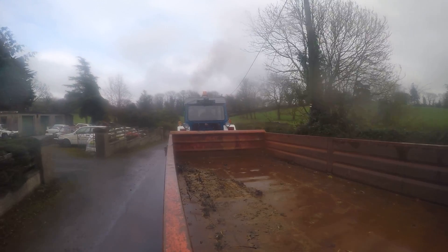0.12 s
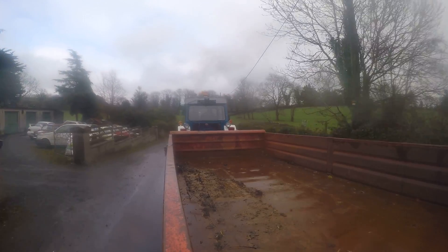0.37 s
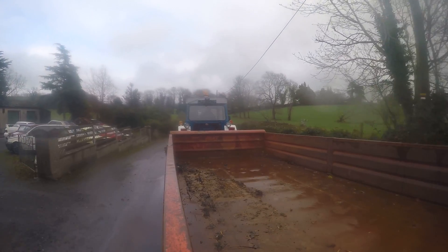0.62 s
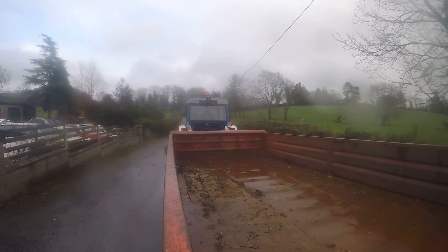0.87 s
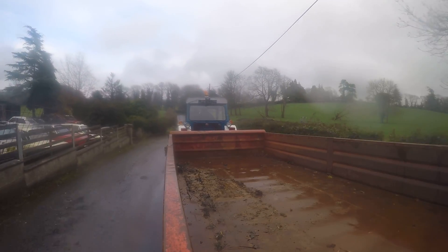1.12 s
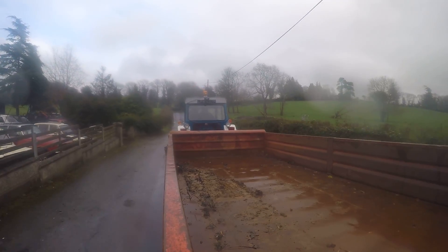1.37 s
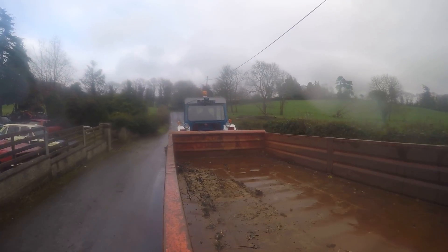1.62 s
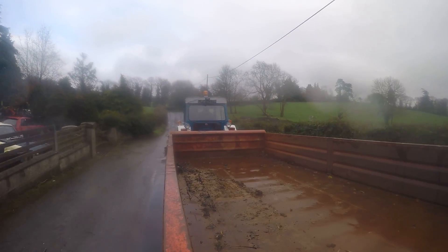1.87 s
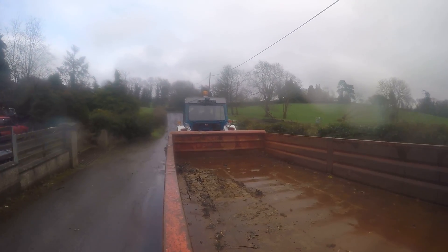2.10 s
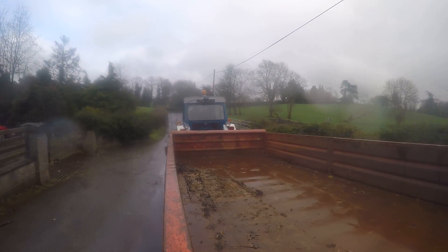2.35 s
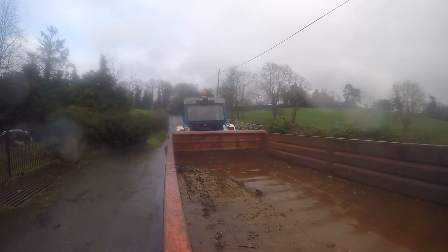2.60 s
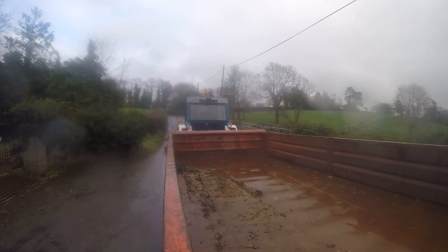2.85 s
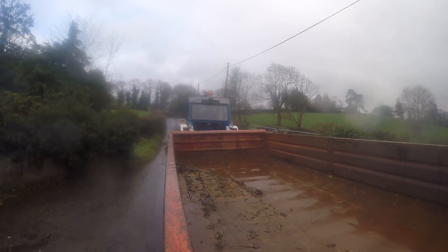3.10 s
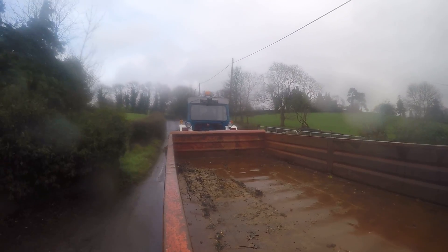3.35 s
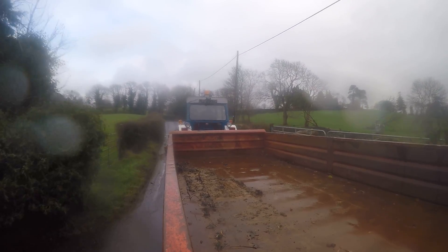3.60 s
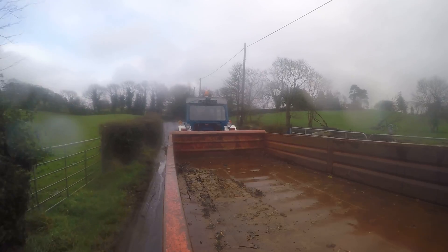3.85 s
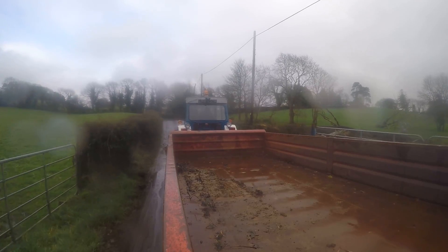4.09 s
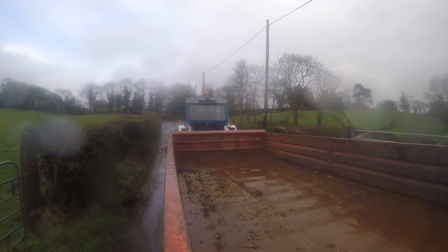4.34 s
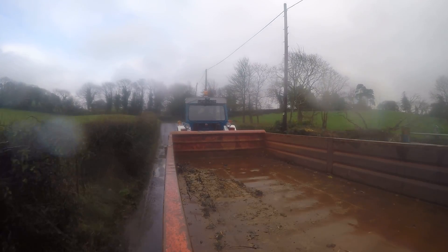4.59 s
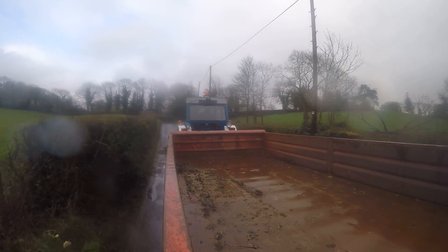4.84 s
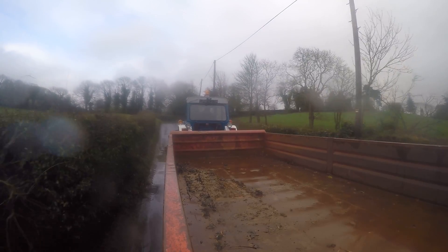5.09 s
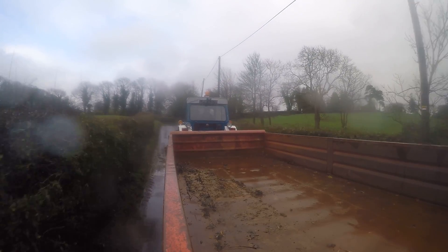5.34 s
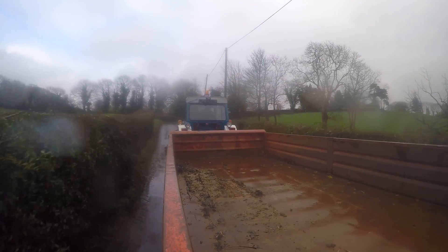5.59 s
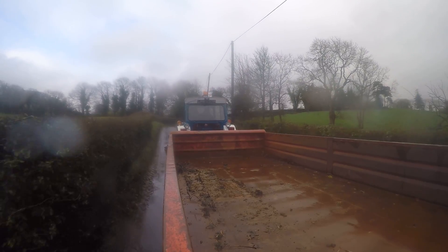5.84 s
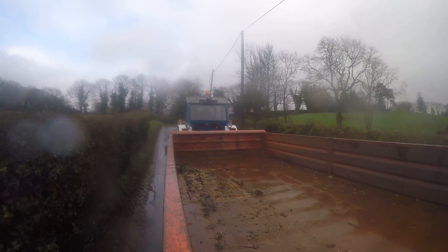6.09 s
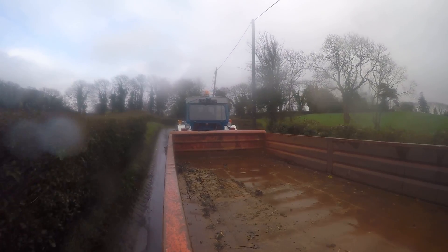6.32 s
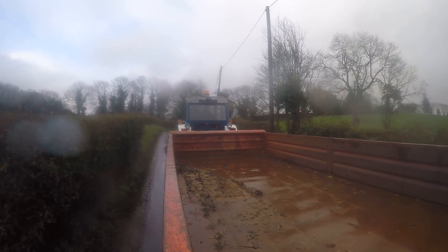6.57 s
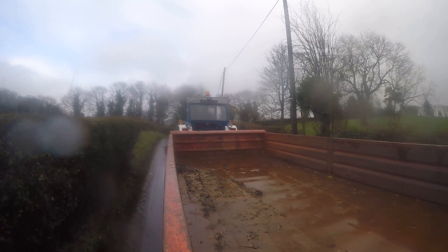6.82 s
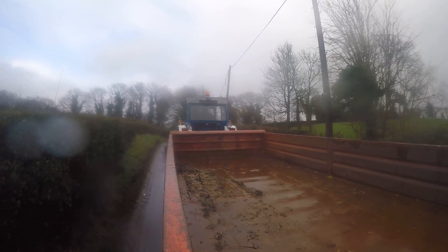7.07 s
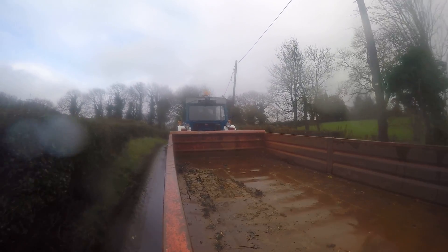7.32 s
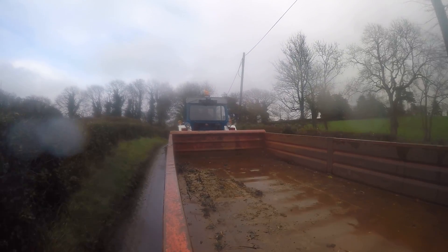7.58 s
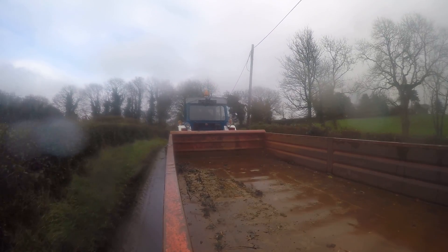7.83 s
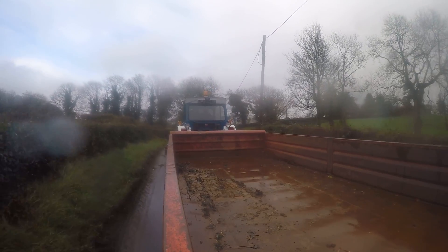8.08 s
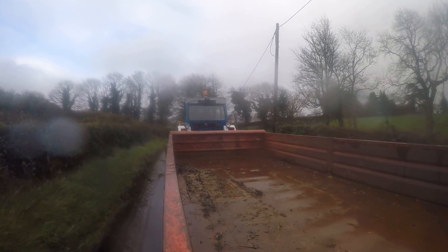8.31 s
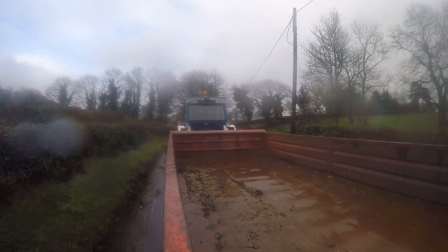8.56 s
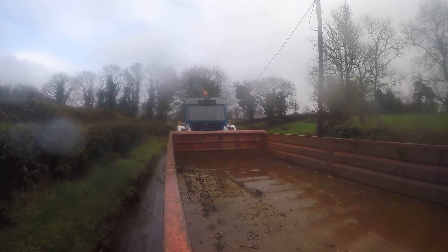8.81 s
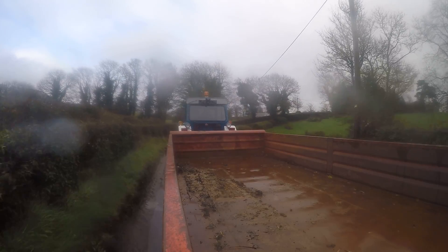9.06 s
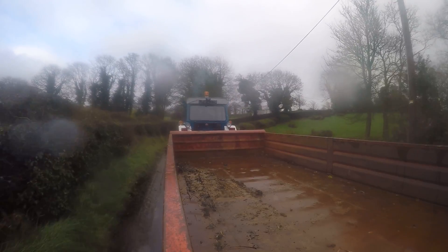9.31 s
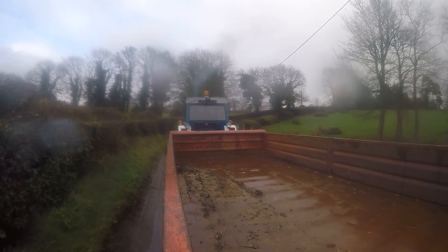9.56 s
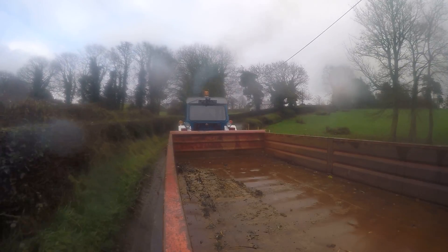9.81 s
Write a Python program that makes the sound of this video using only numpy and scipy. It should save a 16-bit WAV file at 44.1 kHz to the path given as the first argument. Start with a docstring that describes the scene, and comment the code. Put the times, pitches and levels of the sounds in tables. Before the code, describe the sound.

A close, muffled, body-borne sound from a sealed camera clamped to an empty steel trailer on a wet country road. Throughout, low rumble surges and drops unevenly, with a bounce around 35 to 65 hertz, a throbbing hum near 95 and drumming panels. Over it runs a fine, midrange steel rattle. Scattered light knocks open, and a faint gear whine peaks around 1.2 s. A tight clatter with clicks comes at 1.3 s, more bumps at 2.4 and 3.1, and a strong bang at 3.65. Knocks continue from 4 to 6.3 s with small clinks and pin jingles. At 6.7 to 6.8 s comes the loudest crash, with latch clank and harsh ticks. Around 7.2 s it is thinner; knocks return near 7.8, a sharp stone tap at 8.2, then another clatter at 9.2 to 9.4. Tyre hiss and a very thin high whistle remain barely audible; whine rises gently at the end.

```python
"""Camera clamped to an empty steel trailer

A small camera in a sealed housing rides on the rail of an empty steel trailer behind a diesel tractor.
Road shake comes up the clamp as lopsided noise rumble, a wandering hum and panel drumming; struck modes make
the bed rattle and knock, a stone tap, a pin and a latch jingle; noise crackle ticks the camera against its stop.
Gear whine and a turbo whistle (swept sines) and wet tyre hiss (coloured noise) come faintly through the air."""
import sys
import numpy as np
from scipy import signal
from scipy.fft import rfft, irfft, next_fast_len
from scipy.io import wavfile
from scipy.ndimage import uniform_filter1d

SR = 44100
rng = np.random.default_rng(int(sys.argv[2]) if len(sys.argv) > 2 else 0)


def unload_wav(signal):
    """Save mono or channel-first audio to the path in sys.argv[1] as 16-bit WAV at rate SR, clipped to [-1, 1]."""
    wavfile.write(
        sys.argv[1],
        SR,
        np.round(np.clip(np.atleast_2d(signal).T, -1, 1) * 32767).astype(np.int16),
    )


def magnitude_from_level(level_db):
    """Linear magnitude for a level in decibels (20 dB per decade)."""
    exponent = np.asarray(level_db, float) / 20
    return 10 ** exponent


N = 437913
T = np.arange(N) / SR

# low rumble through the clamp: t/s, level/dB
RUMBLE_LEVEL = [(0.0, -14), (0.02, -22.5), (0.39, -14.5), (0.69, -20.5), (1.35, -12), (1.8, -26.5),
                (1.96, -10), (2.29, -21.5), (2.32, -14), (2.65, -19.5), (3.12, -11.5), (3.18, -16),
                (3.48, -19), (3.57, -13), (4.01, -20.5), (4.17, -13), (4.37, -20), (4.51, -12.5),
                (4.73, -21), (4.75, -15), (4.92, -16.5), (5.12, -13.5), (5.42, -26.5), (5.72, -8.5),
                (6.06, -23), (6.25, -11.5), (6.36, -19.5), (6.8, -12.5), (6.88, -27.5), (7.66, -18),
                (9.4, -16), (9.93, -20)]
# steady noise of the road: t/s, bed rattle level/dB, tyre hiss level/dB
ROAD_LEVEL = [(0.0, -37.5, -51.5), (0.3, -33.5, -46), (0.77, -38.5, -50.5), (1.22, -30.5, -43),
              (1.35, -29, -46), (1.52, -37, -53), (1.77, -40, -52.5), (3.09, -34.5, -49.5),
              (3.34, -36.5, -55), (3.82, -36.5, -53), (4.26, -36.5, -48), (4.64, -33.5, -46.5),
              (5.42, -38, -50.5), (5.72, -32.5, -47), (5.83, -36.5, -53), (6.61, -40.5, -50),
              (6.83, -36, -57), (6.99, -41.5, -61), (7.24, -44.5, -57), (8.1, -35, -49),
              (9.16, -34.5, -47.5), (9.32, -35, -46.5), (9.49, -36.5, -48.5), (9.93, -33.5, -43)]
# steel bed, each row a cluster of close modes: f/Hz, level/dB, t60/s (ring() limits t60)
BED_MODES = [(430.3, -9.5, 0.43), (454.3, 0.5, 0.16), (492.4, -0.5, 0.067), (551, -12.5, 0.18),
             (579, -26, 0.22), (612, -9, 0.092), (889.4, -10.5, 0.45), (973.4, -10, 0.21), (1070, -8, 0.17),
             (1184, -5.5, 0.15), (1270, -3.5, 0.026), (1360, -5.5, 0.12), (1420, 6, 0.031),
             (1490, 2.5, 0.031), (1568, -2.5, 0.066), (1680, -3.5, 0.072), (1741, -1.5, 0.048),
             (1800, -18.5, 0.059), (2380, -5, 0.018), (2430, 5, 0.016), (2570, 0.5, 0.023),
             (2760, -10.5, 0.049), (2960, 0.5, 0.0064), (3345, -3, 0.019), (3660, -3, 0.021),
             (3860, -25.5, 0.011), (5920, -10, 0.0085)]
# blows on the bed: t/s, body peak/dB, dull part re body/dB, bright part re body/dB, struck panel f/Hz
KNOCKS = [(0.144, -20, -24, -26, 1420), (0.336, -24.5, -25, -27, 1550), (0.532, -23.5, -25, -6, 1573),
          (0.705, -26, -10, -4, 1520), (0.938, -26, -26, -0.5, 1360), (1.277, -16, -12, -13, 1376),
          (1.311, -15, -3, -18, 1391), (1.341, -15, -1.5, -8, 1360), (1.5, -20.5, -5, -2, 1360),
          (1.701, -22.5, -11, -10, 1380), (1.938, -23, -2, -4.5, 1360), (2.013, -30.5, 1, 3.5, 1680),
          (2.42, -24.5, -6, -19, 1568), (2.441, -17, -3.5, -12, 1390), (2.788, -30, -19, -2, 1580),
          (2.834, -29.5, -13, 2.5, 1277), (2.875, -24, -2, -5, 1380), (3.047, -15.5, -33, -11, 853),
          (3.071, -16.5, -0.5, -9, 1394), (3.113, -15.5, -5, -18, 1380), (3.178, -22, 0, -20, 1420),
          (3.293, -28, 5.5, -44, 1070), (3.549, -21, 2, -9.5, 1370), (3.634, -16.5, -17, -19, 1420),
          (3.65, -10, -10.5, -8.5, 1320), (3.693, -19, -5, -18, 1375), (4.04, -19, -5.5, -23, 1270),
          (4.232, -24.5, -22, -13, 1373), (4.257, -22, -31, -6, 1420), (4.593, -15, 1.5, -10, 945),
          (4.754, -22, -24, -7, 1796), (4.842, -22.5, -10, -10, 1400), (4.891, -23.5, -2, -28, 1420),
          (5.092, -25.5, -2.5, -5, 1400), (5.144, -15.5, -6, -16, 1560), (5.497, -24.5, -1, -9, 1431),
          (5.513, -16, -2.5, -14, 1351), (5.687, -31, 1, 3, 1238), (5.737, -34, -7, 7, 1390),
          (5.841, -24, -19, -7, 1555), (5.942, -27.5, -6, -16, 1340), (6.125, -23, -9, -11, 1456),
          (6.212, -19, -9, -10, 915), (6.282, -23.5, 3, -4.5, 1486), (6.65, -21, -16, 0.5, 1551),
          (6.697, -3.5, -8.5, 0.5, 1890), (6.736, -4.5, -9.5, -33, 1360), (6.766, -16, 0, -13, 1400),
          (6.776, -21.5, 3, -2, 1840), (6.91, -27, -7, -28, 1387), (7.343, -24, 0.5, -16, 1360),
          (7.773, -18.5, -3.5, -10, 1360), (7.907, -22.5, -10, -10, 1525), (7.937, -15, -1.5, -13, 1189),
          (8.252, -19, -17, -11, 1490), (8.311, -24, -4, -13, 1420), (8.356, -28.5, 1, -14, 1115),
          (8.47, -27, -18, -8, 1712), (8.628, -26.5, -23, -6, 1384), (9.163, -22, -15, -15, 1400),
          (9.243, -15.5, -27, -3.5, 1882), (9.299, -22.5, -20, 0.5, 1550), (9.375, -16, -5, -10, 1320)]


def curves(table):
    """Each column of a time table as one value per sample."""
    s, *columns = np.transpose(table)
    return [np.interp(T, s, c) for c in columns]


def unit(x):
    """Scaled to rms 1."""
    return x / np.sqrt(np.mean(x ** 2))


def colour(x, points):
    """Filter by a (f/Hz, gain/dB) outline, without delay."""
    hz, db = np.transpose(points)
    size = next_fast_len(len(x))
    f = np.maximum(np.arange(size // 2 + 1) * SR / size, 1)
    gain = magnitude_from_level(np.interp(np.log(f), np.log(hz), db))
    return irfft(rfft(x, size) * gain, size)[:len(x)]


def walk(rate_hz):
    """Random levels held 1 / rate_hz and smoothed twice over that time; rms 1."""
    k = int(SR / rate_hz)
    held = np.repeat(rng.standard_normal(N // k + 1), k)
    return unit(uniform_filter1d(uniform_filter1d(held, k), k)[:N])


def tone(hz):
    """Sine of changing pitch, peak 1."""
    return np.sin(2 * np.pi * np.cumsum(hz) / SR)


def ring(modes, extra_db=0, detune=.018):
    """Decaying modes after one tap; a contact of finite length softens the onset."""
    length_s, contact_s = .14, .0004
    hz, db, t60_s = np.transpose(modes)[:, :, None]
    t = np.arange(int(length_s * SR)) / SR
    decay = np.exp(-np.log(1000) * t / np.clip(t60_s, .005, .3))
    fade = decay * (1 - np.exp(-t / contact_s)) ** 2
    # three close neighbours per mode beat and blur each line
    near_hz = hz * (1 + detune * rng.standard_normal((3, len(hz), 1)))
    return np.sum(magnitude_from_level(db + extra_db) * fade * np.sin(2 * np.pi * near_hz * t), axis=(0, 1))


def taps(size, rate_hz, scatter_db):
    """Random contacts, most of them small, a few much larger."""
    hit = rng.random(size) < rate_hz / SR
    size_db = scatter_db * np.minimum(rng.exponential(size=size), 4)
    return hit * magnitude_from_level(size_db) * rng.choice([-1, 1], size)


def strike(modes, fade_s, rate_hz, lean_db, detune=0.024):
    """A blow and its random bounces ringing the modes, peak 1; lean_db shifts each mode's level."""
    bounces_db, rise_s = -11.5, 0.0024
    t = np.arange(SR // 8) / SR
    swell = np.exp(-t / fade_s) * (1 - np.exp(-t / rise_s))
    contacts = taps(len(t), rate_hz, scatter_db=2.5) * swell * magnitude_from_level(bounces_db)
    contacts[0] = 1
    blow = signal.fftconvolve(contacts, ring(modes, lean_db, detune=detune))
    return blow / np.max(np.abs(blow))


def parts(modes, edges_hz):
    """Modes grouped by pitch: separate pieces of steel that are hit at their own moments."""
    modes = np.array(modes)
    group = np.digitize(modes[:, 0], edges_hz)
    return [modes[group == k] for k in range(len(edges_hz) + 1)]


def chance_db(modes):
    """A blow lands anywhere, so the modes answer in new shares."""
    return 3.0 * rng.standard_normal((len(modes), 1))


def add(out, s, sound):
    """Mix a short sound in at time s."""
    i = int(s * SR)
    out[i:i + len(sound)] += sound[:len(out) - i]


def rumble():
    """Road shake: low noise plus a bounce of shifting pitch, made lopsided by the clamp."""
    # noise outline: f/Hz, relative density/dB
    outline = [(7.1, -39), (12, -17), (38, 0), (70, -3), (80, -3.5), (100, -11), (180, -120)]
    # trailer bounce pitch: t/s, f/Hz
    bounce_pitch = [(0, 64.34), (.9, 63), (1.6, 37.96), (2.3, 45), (3.2, 40.18), (3.5, 52.83), (4.1, 33),
                    (5, 40), (5.4, 54.17), (5.7, 48.05), (6.7, 48), (7.1, 54.76), (8.5, 62.9), (9.93, 60)]
    level_db, bounce_hz = curves(RUMBLE_LEVEL)[0], curves(bounce_pitch)[0]
    bounce = magnitude_from_level(3.5 * walk(9)) * tone(bounce_hz + 4.5 * walk(12))
    noise = colour(rng.standard_normal(N), outline)
    swing = unit(.7 * unit(noise) + .7 * unit(bounce))
    # the clamp gives more one way than the other, which sharpens the upward swings
    lopsided = .23 * (swing ** 2 - uniform_filter1d(swing ** 2, size=SR // 16))
    return magnitude_from_level(level_db) * (swing + lopsided)


def hum():
    """The clamp's own hum: a sine that wanders in pitch and throbs unevenly."""
    # t/s, level/dB
    hum_level = [(0.0, -27), (0.11, -40), (0.33, -17.5), (1.16, -18), (1.22, -14.5), (1.27, -41),
                 (1.35, -12.5), (1.49, -28), (1.6, -16.5), (2.13, -23), (2.18, -15.5), (2.49, -32),
                 (2.79, -15), (2.88, -23.5), (4.87, -15.5), (5.0, -24.5), (5.09, -13.5), (5.28, -15),
                 (5.45, -25), (5.72, -20), (6.0, -30.5), (6.06, -19), (6.28, -16.5), (6.64, -33.5),
                 (6.67, -18.5), (6.94, -29.5), (7.61, -15.5), (7.69, -22.5), (8.57, -17.5), (8.65, -30),
                 (8.91, -16), (9.93, -22)]
    centre_hz, wander_rms_hz = 95.26, 2.315
    throb = magnitude_from_level(2.1 * walk(11))
    sine = np.sqrt(2) * tone(centre_hz + wander_rms_hz * walk(18))
    return magnitude_from_level(curves(hum_level)[0]) * throb * sine


def drumming(shaking):
    """Panels drum as coloured noise, with the rumble and after each blow."""
    # f/Hz, relative density/dB
    outline = [(65, -29.5), (110, 2), (124, -15.5), (156, -8), (194, -18.5), (302, -27.5), (340, -58),
               (440, -71.5), (750, -120)]
    under_rumble_db, jolt_gain_db = -14.5, -15.5
    noise = unit(colour(rng.standard_normal(N), outline)) * magnitude_from_level(1.98 * walk(8))
    level = magnitude_from_level(curves(RUMBLE_LEVEL)[0] + under_rumble_db) + magnitude_from_level(jolt_gain_db) * shaking
    return level * noise


def jolt():
    """How much the bed still shakes from the blows: each swells quickly and dies away in energy."""
    rise_s, fade_s = 0.028, 0.035
    blows = np.zeros(N)
    for s, peak_db, *_ in KNOCKS:
        blows[int(s * SR)] = magnitude_from_level(peak_db) ** 2
    t = np.arange(SR // 2) / SR
    swell = (1 - np.exp(-t / rise_s)) * np.exp(-t / fade_s)
    return np.sqrt(np.abs(signal.oaconvolve(blows, swell)[:N]))


def bed_rattle(shaking):
    """Loose boards and grit tap the steel all the time, ringing its modes; blows leave it shaking."""
    jolt_gain_db = -23.5
    rattle = 0
    for modes in parts(BED_MODES, [750, 1220, 2100, 3050]):
        unsteady = magnitude_from_level(2.6 * walk(25) + 1.5 * walk(6))
        drive = unit(taps(N, 1300, scatter_db=3.2)) * unsteady
        rattle = rattle + signal.oaconvolve(drive, ring(modes, detune=0.014))[:N]
    level = magnitude_from_level(curves(ROAD_LEVEL)[0]) + magnitude_from_level(jolt_gain_db) * shaking
    return level * unit(rattle)


def knocks():
    """Bumps strike the bed hard and clatter on, ringing its dull, body and bright modes."""
    clatter_s, rate_hz = 0.02, 2500
    out = np.zeros(N)
    dull, body, bright, _ = parts(BED_MODES, [750, 2100, 3050])  # the highest modes stay out
    for s, peak_db, dull_db, bright_db, panel_hz in KNOCKS:
        # modes near the struck panel's pitch answer most: -9 dB per octave away
        near_db = -9 * np.abs(np.log2(body[:, :1] / panel_hz))
        for modes, db, lean_db in ((body, 0, near_db), (dull, dull_db, 0), (bright, bright_db, 0)):
            blow = strike(modes, clatter_s, rate_hz, lean_db + chance_db(modes))
            add(out, s, magnitude_from_level(peak_db + db) * blow)
    return out


def stone():
    """A stone on a board: a short strike of two modes."""
    # f/Hz, level/dB, t60/s
    stone_modes = [(1530, 6, 0.014), (1720, -11, 0.0081)]
    # t/s, peak/dB
    hits = [(8.1813, -9)]
    out = np.zeros(N)
    for s, peak_db in hits:
        add(out, s, magnitude_from_level(peak_db) * strike(stone_modes, .004, 2500, 0))
    return out


def ticks():
    """About a millisecond of crackle as the camera meets its stop, then the rebound as one low swing."""
    # t/s, crackle level before colouring/dB
    contacts = [(0.447, -43.5), (0.8973, -47), (1.262, -50), (1.353, -28.5), (1.3778, -29.5),
                (1.4164, -39.5), (2.0652, -39), (2.1811, -33.5), (2.8882, -38), (3.118, -42.5),
                (4.7546, -41.5), (4.9848, -44), (5.1284, -37), (5.5515, -36.5), (5.628, -36), (5.7522, -32),
                (5.775, -35.5), (6.0756, -45), (6.08, -42.5), (6.095, -40), (6.144, -37.5), (6.2267, -36),
                (6.2427, -45.5), (6.6958, -38), (6.7012, -22.5), (6.7057, -26), (6.7182, -32), (6.743, -34),
                (6.7783, -15), (6.809, -41.5), (7.626, -42), (7.8107, -42.5), (7.848, -44), (8.738, -45.5),
                (8.7818, -37.5), (8.8163, -39), (8.998, -42.5), (9.016, -38.5), (9.106, -42), (9.1263, -45),
                (9.207, -34.5), (9.2996, -34.5), (9.3348, -38), (9.464, -40)]
    # crackle outline: f/Hz, gain/dB
    outline = [(700, -8.5), (2500, 19.5), (4500, 8.5), (7000, 4), (10500, -1), (14000, -0.5), (15500, -13)]
    # ticks above hard_db are duller at the top: f/Hz, gain/dB
    hard_outline = [(5000, 1.5), (9000, -3), (14000, -10)]
    hard_db, swing_hz, swing_peak_s = -27.5, 75, .009
    sharp, hard, low = np.zeros((3, N))
    t = np.arange(SR // 20) / SR
    crackle = np.exp(-((t - .0008) / 0.00088) ** 2)
    envelope = (t / swing_peak_s) ** 2 * np.exp(2 - 2 * t / swing_peak_s)
    swing = -np.sin(2 * np.pi * swing_hz * t) * envelope
    gaps_s = np.diff([row[0] for row in contacts], append=np.inf)
    for (s, level_db), gap_s in zip(contacts, gaps_s):
        layer = hard if level_db > hard_db else sharp
        add(layer, s, magnitude_from_level(level_db) * rng.standard_normal(len(t)) * crackle)
        # harder ticks rebound further, up to a limit; none if the next contact comes within 12 ms
        rebound = .36 * np.clip((level_db + 47) / 14, 0, 1) * (gap_s > .012)
        add(low, s, rebound * swing)
    return colour(sharp + colour(hard, hard_outline), outline) + low


def pin():
    """A loose steel pin jingles: struck modes, bouncing for some milliseconds."""
    # f/Hz, level/dB, t60/s
    pin_modes = [(2630, 9, 0.032), (3730, 10.5, 0.02), (4530, 6, 0.022), (6770, 2, 0.012),
                 (7200, -12, 0.015), (9090, -5.5, 0.05), (12250, -10, .03), (13800, -15, 0.016),
                 (12700, -11, .025)]
    # t/s, peak/dB
    jingles = [(4.7562, -25.5), (5.726, -28), (5.8558, -23.5), (6.1265, -22), (8.1544, -33.5),
               (8.255, -25.5), (9.205, -40), (9.3363, -34)]
    out = np.zeros(N)
    for s, peak_db in jingles:
        jingle = strike(pin_modes, 0.011, 4000, chance_db(pin_modes), detune=0.008)
        add(out, s, magnitude_from_level(peak_db) * jingle)
    return out


def latch():
    """A latch clinks as struck modes, and chatters faintly at random, following the bed rattle level."""
    # f/Hz, level/dB, t60/s
    latch_modes = [(3430, -9, 0.022), (3555, -3.5, 0.025), (3840, -29.5, 0.0067), (4090, -4.5, 0.016),
                   (4720, -15.5, 0.026)]
    # t/s, peak/dB
    clinks = [(0.3361, -34), (1.3299, -32), (1.3525, -26), (1.3726, -29), (1.933, -32), (2.0135, -27.5),
              (2.8389, -32), (2.9741, -34), (3.0714, -34), (3.2898, -32), (4.1312, -31.5), (4.7556, -30),
              (5.0946, -31), (5.1269, -35), (5.5132, -30), (5.6263, -33), (5.7264, -29), (5.823, -35),
              (5.8556, -24), (6.1265, -29), (6.2507, -28), (6.2754, -27.5), (6.704, -9), (6.776, -16),
              (6.8364, -35), (6.9105, -35.5), (8.2541, -34), (8.313, -30), (9.2529, -31)]
    faint_per_s, faint_db = 9, -42.5
    out = np.zeros(N)
    for s, peak_db in clinks:
        add(out, s, magnitude_from_level(peak_db) * strike(latch_modes, .006, 3000, chance_db(latch_modes)))
    clink = ring(latch_modes)
    chatter = signal.oaconvolve(taps(N, faint_per_s, scatter_db=3.5), clink / np.max(np.abs(clink)))[:N]
    rattle_db = curves(ROAD_LEVEL)[0]
    return out + magnitude_from_level(faint_db + rattle_db - np.mean(rattle_db)) * chatter


def gear_whine():
    """Gear mesh: a wandering sine and its octave, wavering together."""
    # t/s, f/Hz, first partial level/dB, second partial level/dB
    gears = [(0, 1120, -52, -60), (.5, 1160, -50, -58), (.74, 1168, -48, -49), (.88, 1180, -47, -42),
             (.96, 1192, -45, -50), (1.25, 1203, -43, -49), (1.8, 1150, -66, -74), (6.9, 1145, -72, -78),
             (7.45, 1125, -52, -72), (7.8, 1105, -57, -72), (8.4, 1108, -49, -70), (8.9, 1105, -49, -70),
             (9.3, 1128, -46, -66), (9.6, 1168, -45, -65), (9.93, 1182, -41, -64)]
    hz, first_db, second_db = curves(gears)
    hz = hz + 1.5 * walk(15)
    waver = magnitude_from_level(2.5 * walk(12))
    return waver * np.sqrt(2) * (magnitude_from_level(first_db) * tone(hz) + magnitude_from_level(second_db) * tone(2 * hz))


def turbo_whistle():
    """A thin sine, unsteady in pitch and level."""
    # t/s, f/Hz, level/dB
    turbo = [(0, 13250, -78), (.45, 12700, -81), (.8, 11400, -82), (1, 11280, -68), (1.5, 10500, -70),
             (2, 9660, -69), (2.6, 8660, -83), (3.5, 7790, -74), (4, 7800, -67.5), (4.7, 8350, -68),
             (5.2, 8850, -80), (6, 8850, -99), (7.1, 9840, -82), (7.5, 9930, -74), (8.8, 10750, -74),
             (9.3, 11100, -73), (9.6, 12900, -84), (9.93, 13350, -90)]
    hz, db = curves(turbo)
    whistle = np.sqrt(2) * tone(hz + 70 * walk(200))
    return magnitude_from_level(db + 3.0 * walk(40)) * whistle


def tyres():
    """Spray from wet tyres: coloured noise hiss with fine grit."""
    # f/Hz, relative density/dB
    outline = [(1650, -29.5), (2800, -8), (3700, -18.5), (4030, -16), (7850, -26), (8930, -32),
               (10000, -30.5), (12300, -38), (13500, -33), (14500, -39), (15500, -51.5)]
    grit = unit(taps(N, 2500, scatter_db=3.5))
    hiss = unit(colour(rng.standard_normal(N) + 0.9 * grit, outline))
    return magnitude_from_level(curves(ROAD_LEVEL)[1] + 1.3 * walk(25)) * hiss


def scene():
    """Everything reaches one microphone, mostly through the clamp."""
    shaking = jolt()
    clamp = rumble() + hum() + drumming(shaking)
    steel = bed_rattle(shaking) + knocks() + stone() + pin() + latch()
    air = gear_whine() + turbo_whistle() + tyres()
    return (clamp + steel + ticks() + air)[None]


def roll_off(x):
    """The treble ends steeply here."""
    return signal.sosfilt(signal.butter(12, 15680, fs=SR, output="sos"), x)


def record(dry):
    """The input stage rounds the tallest peaks and cuts the top."""
    top, top_hz = .98, 15600
    rounded = dry / (1 + np.abs(dry / top) ** 6) ** (1 / 6)
    mix = signal.sosfilt(signal.butter(6, top_hz, fs=SR, output="sos"), rounded)
    return roll_off(mix)


dry = scene()
out = record(dry)
unload_wav(out)
```